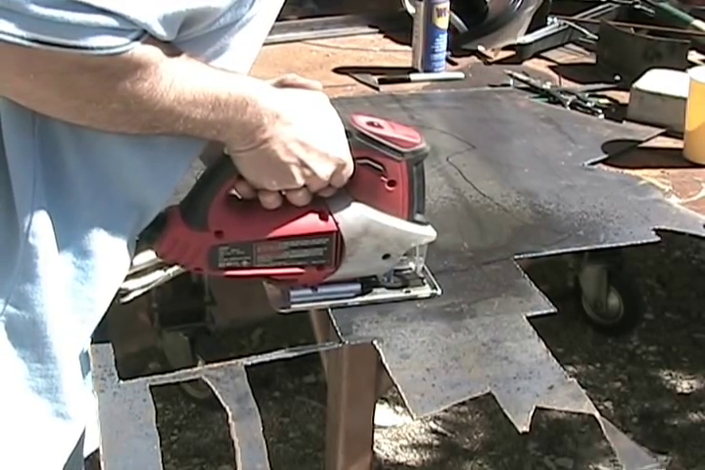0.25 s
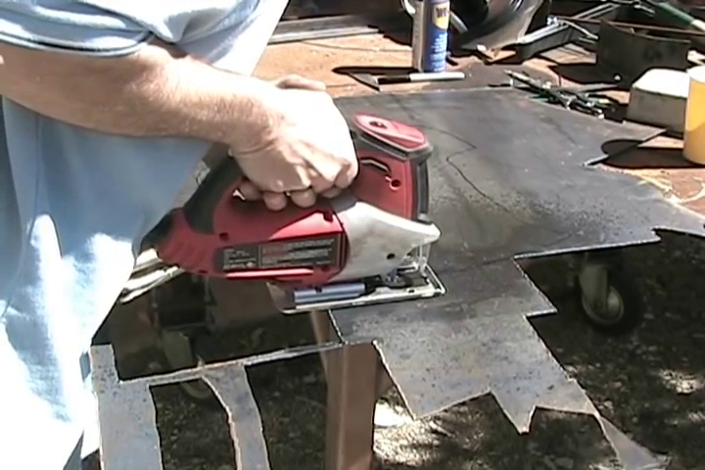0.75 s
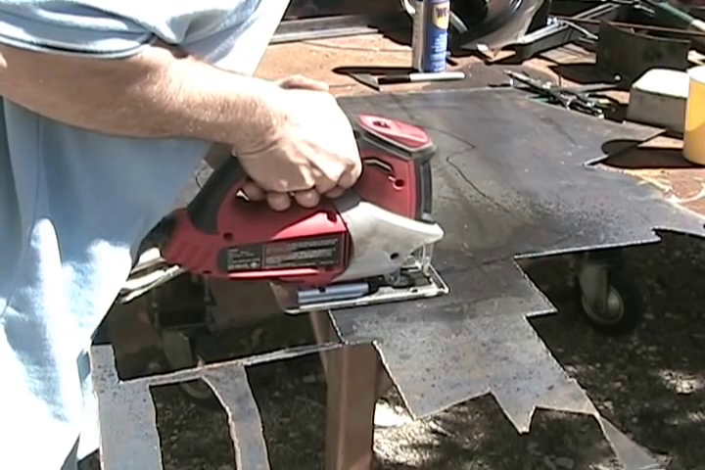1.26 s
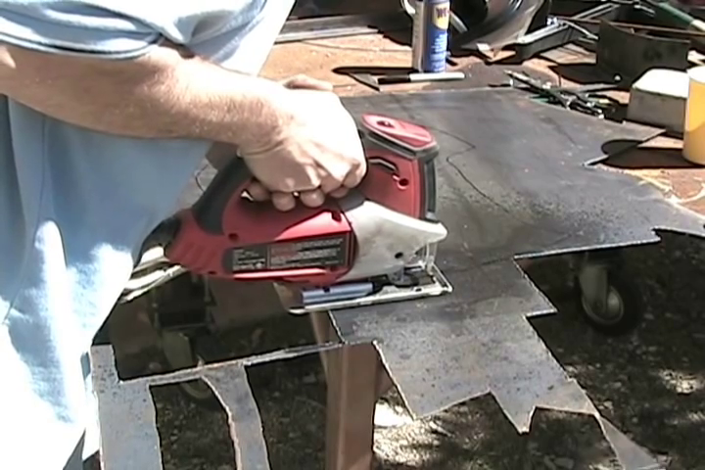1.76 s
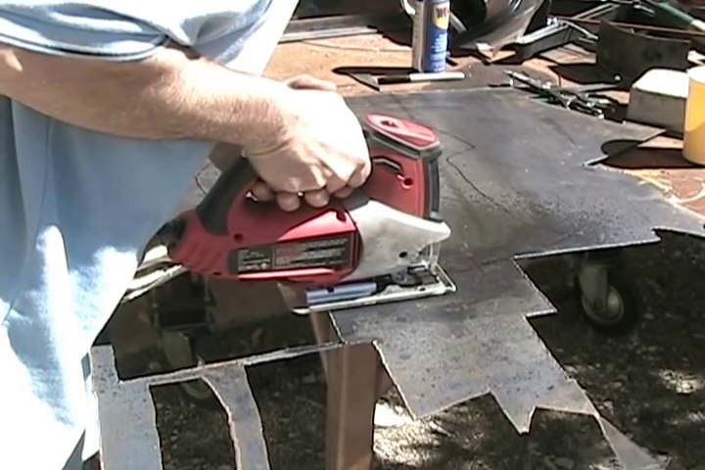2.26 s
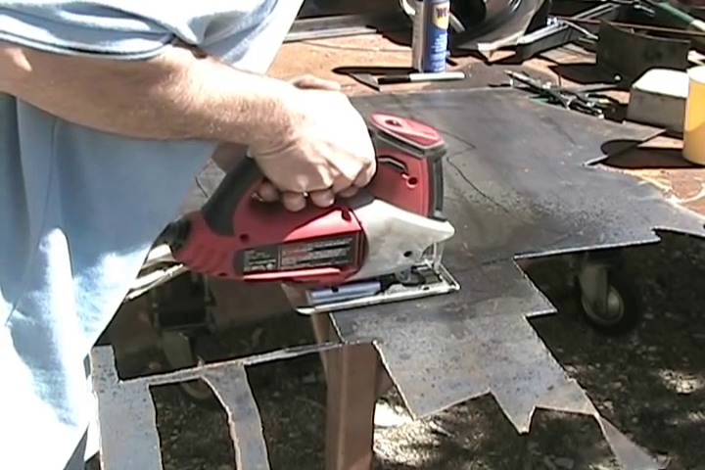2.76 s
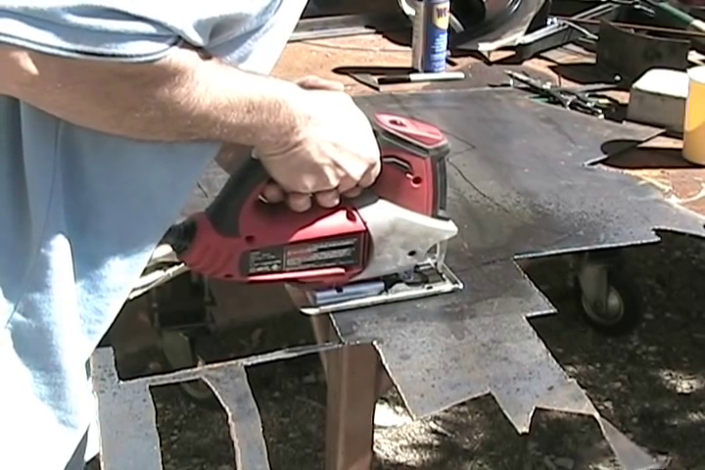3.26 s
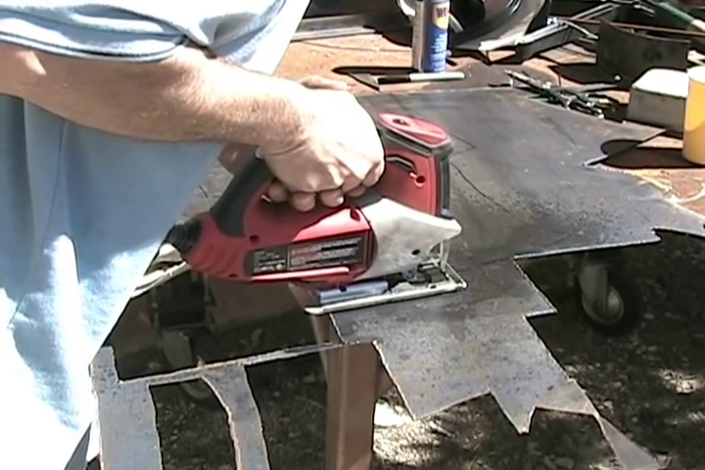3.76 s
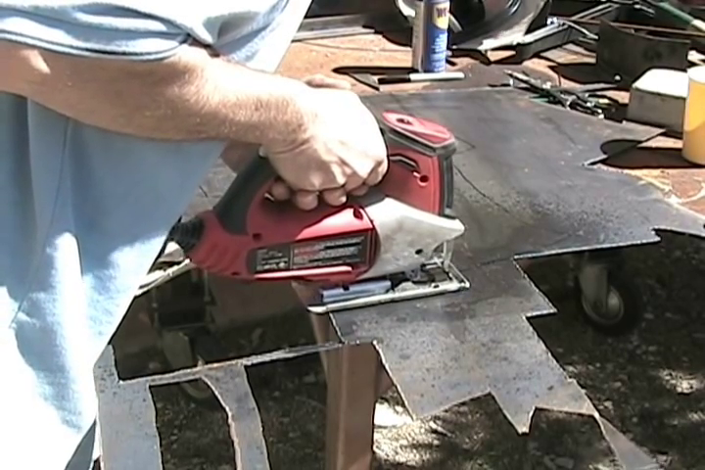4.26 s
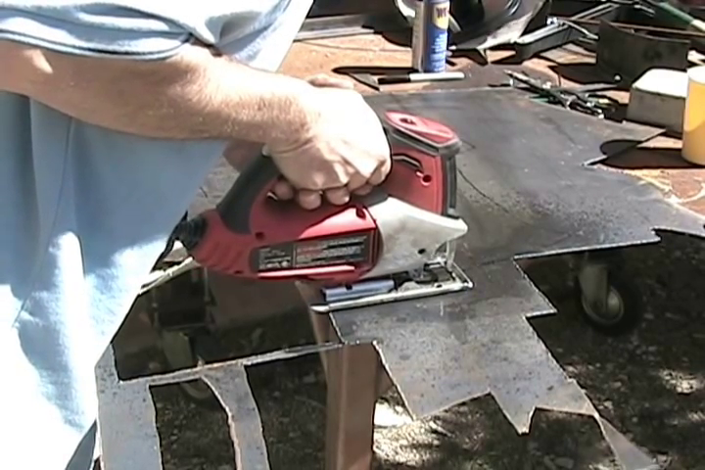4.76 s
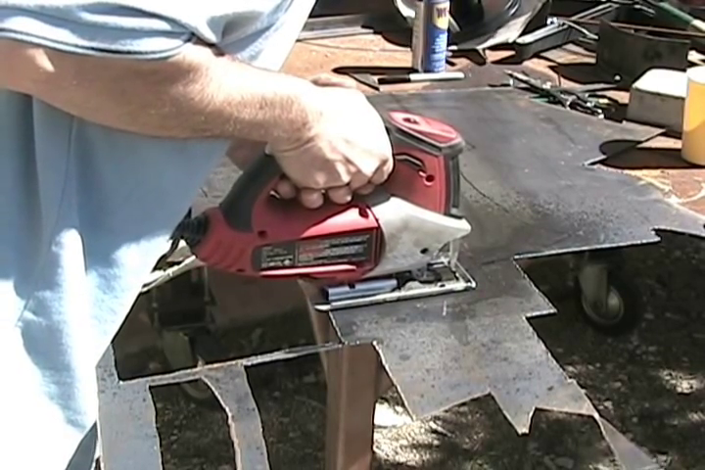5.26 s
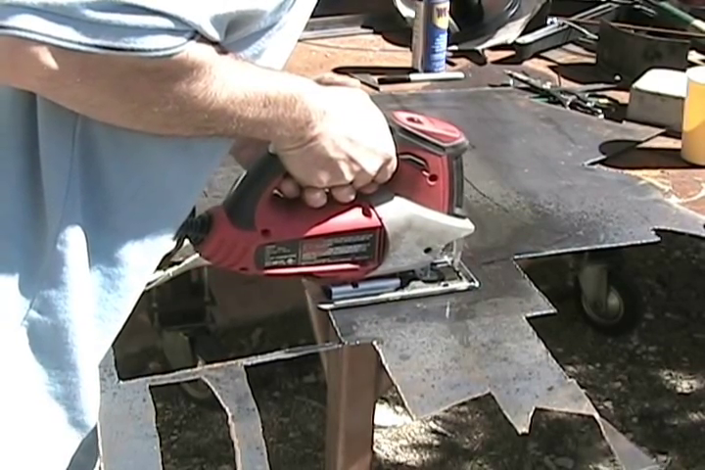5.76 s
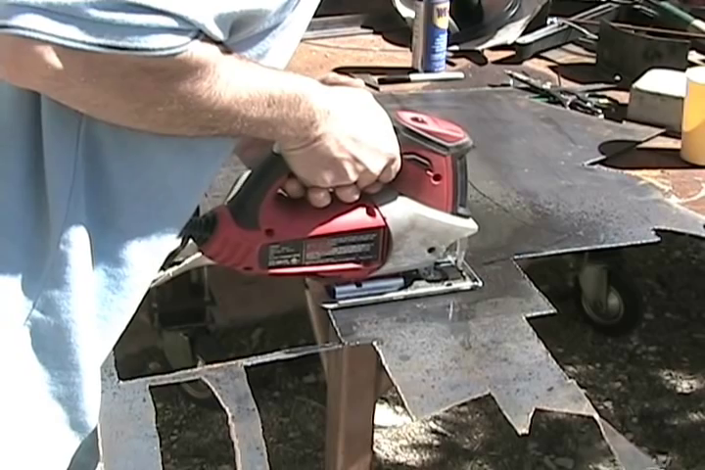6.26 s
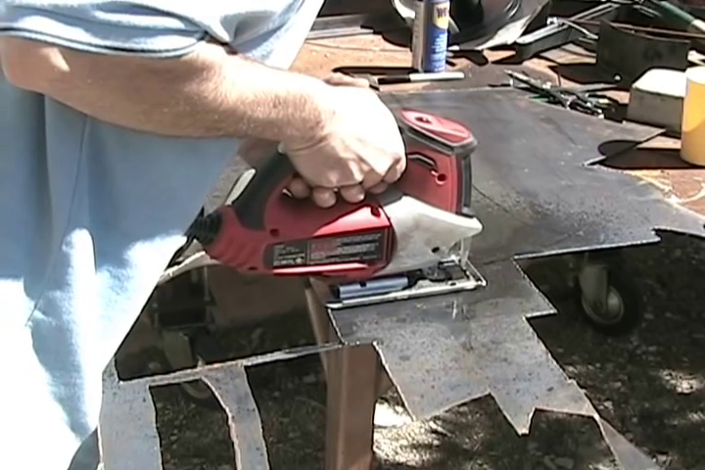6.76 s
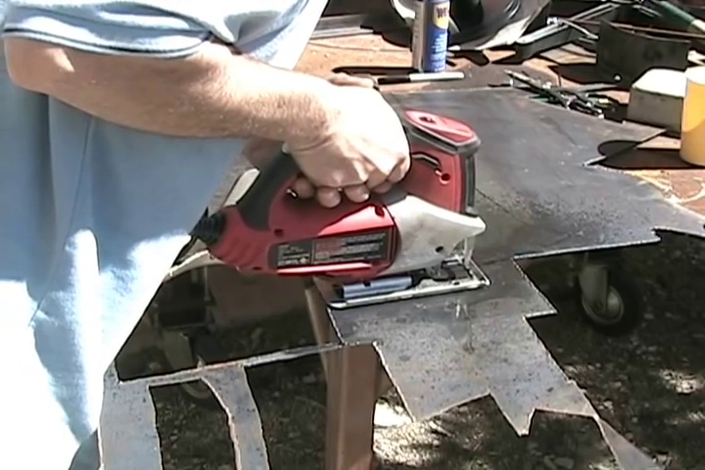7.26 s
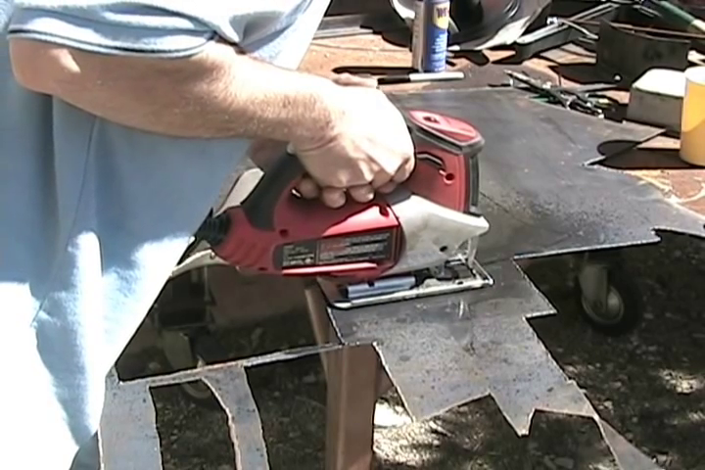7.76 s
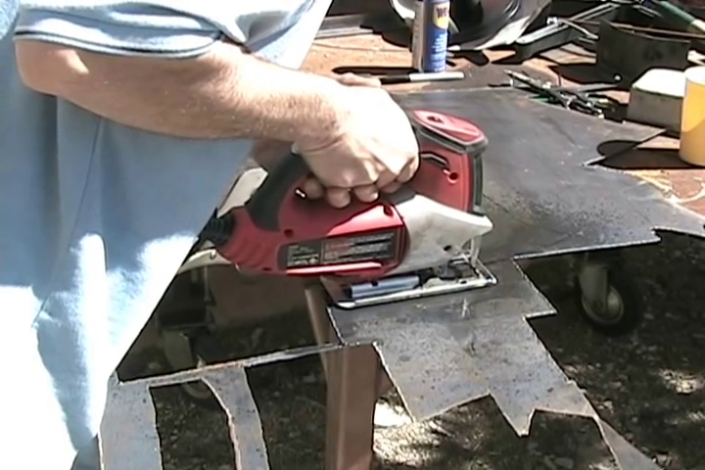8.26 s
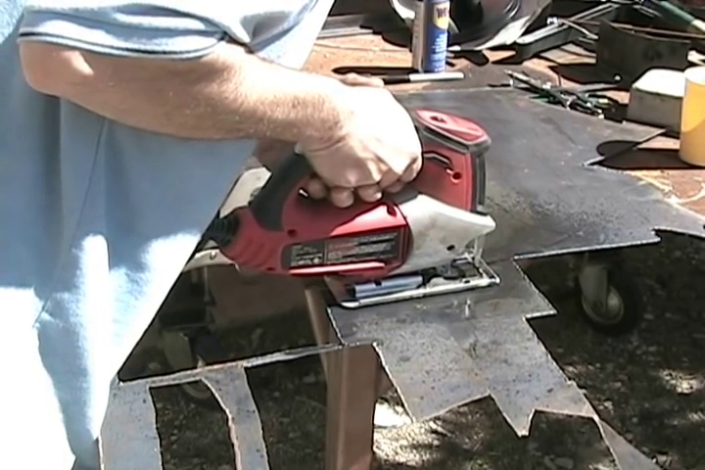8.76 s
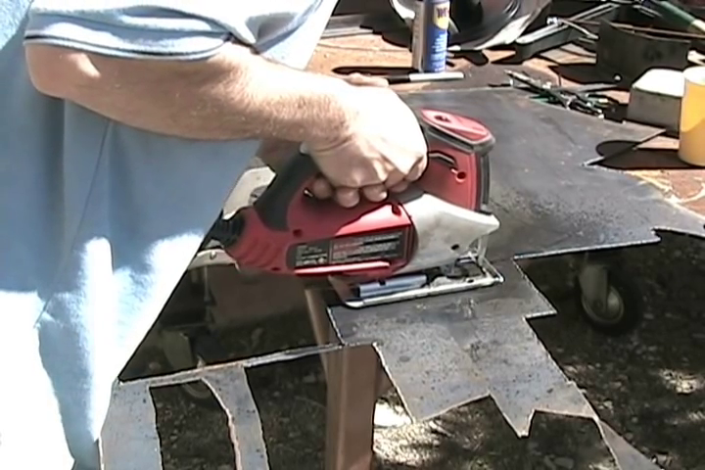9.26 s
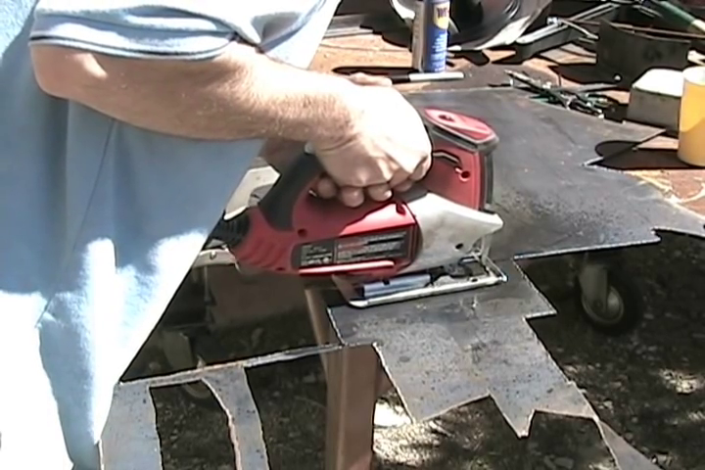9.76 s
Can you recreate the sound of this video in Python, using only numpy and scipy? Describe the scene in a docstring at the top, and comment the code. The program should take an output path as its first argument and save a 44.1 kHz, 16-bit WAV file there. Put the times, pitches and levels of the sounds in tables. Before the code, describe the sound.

An unbroken harsh buzz of an electric saw in sheet metal, heard close and dry in the open air. Rapid tooth clicks fuse into a rough mid-range roar with nasal metallic resonances and faint passing squeals. The rattle becomes looser and more irregular midway, with sharp bites and short clangs, then evens out somewhat, still cutting at the end. The stereo microphone crackles with little pops and has a dulled extreme treble.

```python
"""Jigsaw in thin sheet steel

Place: a bench outdoors, a corded jigsaw a metre or two from the two capsules of a camcorder microphone.
The blade strokes about 35 times a second: tooth clicks rasp the steel, bite hardest once a stroke, and a
rattle rings the sheet's resonances. Crank and gear hum on multiples of the stroke rate; the sheet clangs and
squeals. The camcorder overloads with a pop on each grip, notches multiples of its drum rate and cuts the
top treble; faint uneven swells of low noise lie beneath."""
import sys
import numpy as np
from scipy import signal
from scipy.fft import rfft, irfft
from scipy.io import wavfile
from scipy.ndimage import uniform_filter1d

SR = 44100
rng = np.random.default_rng(int(sys.argv[2]) if len(sys.argv) > 2 else 0)


def transcribe(u):
    """Save the signal u as a 16-bit wav file named by the first command-line argument.

    u: samples, shape (n,) or (channels, n), limited to [-1, 1]; the rate is SR.
    q: integer samples, one column per channel.
    """
    v = np.clip(np.atleast_2d(u).T, -1, 1)
    q = np.round(v * 32767).astype(np.int16)
    wavfile.write(sys.argv[1], SR, q)


N = 441000
T = np.arange(N) / SR
HZ = np.arange(N // 2 + 1) * SR / N + 1e-3  # kept off zero for the divisions
FREED_S = 2.4, 3  # the strip comes loose between these times and shakes more from then on
# points of the stroke (0-1) where the shoe (low tones) and the sheet (high tones) are struck
SHOE_KNOCK_AT, SHEET_KNOCK_AT = 0.1207, 0.38


# blade speed: (time [s], rate [strokes per second])
STROKE_RATE = [(0, 33.244), (1.5, 34.286), (1.75, 33.951), (2.75, 34.612), (3.0, 34.27), (3.5, 34.599),
               (3.75, 33.922), (4.25, 34.883), (6.25, 34.971), (6.75, 34.886), (8.5, 35.425),
               (10.0, 34.905)]


def stroke_count():
    """Strokes made so far: the running sum of the blade speed, its fraction the point of the stroke."""
    return np.cumsum(np.interp(T, *np.transpose(STROKE_RATE))) / SR


# course of the cut: (time [s], rasp level [dB], treble above 3.5 kHz [dB], usual pop of a stroke [dB])
CUT_COURSE = [(0, -28.5, -0.5, -51), (.7, -28, -1.5, -48.5), (2, -28, -2, -48), (3.3, -28, -1.5, -47),
              (4.6, -27.5, -3.5, -42), (5.2, -28, -3, -41.5), (6.5, -28, -2.5, -35), (7, -28, -3, -46.5),
              (8.5, -27, -3.5, -47.5), (10, -27.5, -3, -47)]
FLUTTER_DB, FLUTTER_PER_S = 0.86, 10.0
TREBLE_HOLD = 0.81  # share of the flutter that spares the treble


def cut_course():
    """The rasp's level flutters, its treble less; the usual pop follows the cut."""
    s, *columns = np.transpose(CUT_COURSE)
    rasp_db, bright_db, usual_db = (np.interp(T, s, column) for column in columns)
    flutter_db = FLUTTER_DB * walk(FLUTTER_PER_S)
    return rasp_db + flutter_db, bright_db - TREBLE_HOLD * flutter_db, usual_db


# hard bites: (time [s], pop level [dB], sign of the pop [about +1 left up, -1 right up], surge of grit [dB])
HARD_BITES = [(.178, -38, 1, 2.3), (.205, -42, -1, 2.8), (0.2355, -27, 1, 2.5), (.388, -42, 0.92, 2),
              (.435, -42, -1, 2.3), (.597, -40, 1, 2), (2.183, -43, 1, 2.5), (3.2302, -33, -1, 3),
              (3.4304, -34, 1, 2.2), (3.7229, -33, 1, 3.5), (3.871, -40, 1, 2.5), (4.1318, -28, -1, 3.9),
              (4.447, -37, 1, 2.5), (4.7644, -33, -1, 2), (4.9685, -32, 1, 3.4), (5.0481, -32, -1, 3.8),
              (5.1046, -26, -1, 4.1), (5.1346, -28, -1, 4.5), (5.2167, -31, -1, 3.7), (5.363, -33, 1, 2),
              (5.5661, -32, -1, 3.3), (5.62, -25, 1, 3.6), (5.7636, -29, 1, 2.4), (5.8228, -30, -1, 1.7),
              (5.8783, -30, 1, 3.2), (5.9374, -33, -1, 2.6), (5.966, -30, -1, 3.7), (6.1365, -30, 1, 3.5),
              (6.1648, -29, 1, 3.6), (6.2247, -30, 1, 2.9), (6.3956, -33, -1, 1.7), (6.5644, -33, 1, 2.9),
              (6.794, -29, 1, 2.5), (7.1097, -29, -1, 4.3), (7.1375, -36, 1, 3.3), (7.2556, -32, -1, 3.7),
              (7.7116, -34, 1, 3.6), (7.765, -34, -1, 1.5), (8.245, -42, 1, 2.6), (9.31, -32, 1, 2.5)]
BITE_AT = 0.914  # point of the stroke where the teeth grip
HARDEST_DB = -34  # loudest pop of an ordinary stroke
GRIT_DB, GRIT_PER_POP = 3, 0.16  # grit at that pop; dB less per dB of pop


def grips(turns, usual_db):
    """Per stroke a signed pop and a surge of grit, of chance size; hard bites replace ordinary ones."""
    count = int(turns[-1])
    size, side, late, rough = rng.standard_normal((count, 4)).T
    at = np.interp(np.arange(count) + BITE_AT + 0.016 * late, turns, T)
    s, db, sign, grit_db = np.transpose(HARD_BITES)
    free = np.abs(at[:, None] - s).min(axis=1) > 0.012  # strokes with no hard bite within 12 ms
    peak_db = np.minimum(np.interp(at, T, usual_db) + 5.4 * size, HARDEST_DB)
    surge_db = GRIT_DB + GRIT_PER_POP * (peak_db - HARDEST_DB) + 0.35 * rough
    where = (np.r_[at[free], s] * SR).astype(int)
    ordinary_pops = (undb(peak_db) * np.sign(side))[free]
    overloads, grit = np.zeros((2, N))
    overloads[where] = np.r_[ordinary_pops, undb(db) * sign]
    grit[where] = np.maximum(undb(np.r_[surge_db[free], grit_db]) - 0.9, 0)
    return overloads, grit


def burst(grit, rise_s, fall_s, lead_s):
    """Envelope that swells just before each grip's pop and dies away."""
    t = np.arange(int(0.05 * SR)) / SR
    body = (1 - np.exp(-t / rise_s)) ** 2 * np.exp(-t / fall_s)
    bursts = signal.fftconvolve(grit, body / body.max())[:N]
    return np.interp(T + lead_s, T, bursts)


# broad colour of the rasp: (frequency [Hz], relative gain [dB])
RASP_COLOUR = [(40, -49), (95, -38.5), (200, -31), (380, -20.5), (600, -18.5), (1050, -6.5), (2040, -7),
               (3500, -10), (4600, -10.5), (5050, -12.5), (5900, -11), (6400, -13), (7000, -18),
               (8000, -22), (9000, -18), (10000, -23), (11500, -31), (14200, -46)]
# gain of the bass before and after the strip comes loose: [dB]
RUMBLE_GAIN = [-3, -0.5]
RETURN_AT = 0.43  # point of the stroke where the blade turns
BLADE_HZ, BLADE_WIDTH_HZ, BLADE_DB = 5850, 500, 11  # the blade rings on each bite
BLADE_MOST = 0.6  # grit above which its ring grows no further


def teeth(turns, grit, bright_db):
    """Dense tooth clicks, treble loudest as the blade grips, through the sheet's broad colour."""
    turn = np.interp(T, FREED_S, (0.3, 0.1)) * near(turns, RETURN_AT, 4.9)
    grip = 2.34 * burst(grit, 0.0015, 0.008, 0.0039) + turn
    clicks = rng.standard_normal(N) * undb(0.88 * rng.standard_normal(N))
    # shifted copies of the clicks serve as unrelated ones
    top_clicks, blade_clicks = np.roll(clicks, N // 2), np.roll(clicks, N // 4)
    rasp = colour(RASP_COLOUR)
    high = 1 / (1 + (3550.0 / HZ) ** 4)  # share of the power in the treble
    low = shape(clicks * (1 + 0.059 * grip), rasp * np.sqrt(1 - high))
    top = shape(top_clicks * (1 + grip) * undb(bright_db + 0.5 * walk(14)), rasp * np.sqrt(high))
    bass = shape(low, 1 / (1 + (HZ / 470.0) ** 4))
    rumble = undb(np.interp(T, FREED_S, RUMBLE_GAIN) + 2.0 * walk(6))
    blade_burst = burst(np.minimum(grit, BLADE_MOST), 0.0012, 0.0034, 0.003)
    blade = shape(blade_clicks * blade_burst, rasp * ring(BLADE_HZ, BLADE_WIDTH_HZ))
    return low + (rumble - 1) * bass + undb(2.0) * top + undb(BLADE_DB) * blade


MEMORY = 0.85  # how much a stroke keeps of the last


def recurring(turns):
    """The same teeth meet the same edge: a rattle that nearly repeats every stroke, bunched at the knock."""
    steps = 512  # random values per stroke
    fresh = rng.standard_normal((int(turns[-1]) + 1, steps))
    pattern = signal.lfilter([1], [1, -MEMORY], fresh, axis=0).ravel()
    bunched = np.exp(1.3 * np.cos(2 * np.pi * (turns - SHEET_KNOCK_AT)))
    return level(np.interp(turns * steps, np.arange(len(pattern)), pattern) * bunched, 0)


# sheet resonances: (frequency [Hz], width [Hz], relative drive [dB],
# point of the stroke [0-1], swing [dB; + loudest at that point, - softest there])
SHEET_MODES = [(450, 105, -21.5, 0.05, 2), (746, 16, -11, 0.57, 2), (797, 25, -11, 0.56, 5.5),
               (829, 38, -6, 0.4, -8), (1006.5, 27, -3.5, 0.2, -1.5), (1035, 34, 2, 0.78, 3.5),
               (1085, 44, 1, 0, 4.5), (1165, 26, -6, 0.6, 8), (1254, 34, -.5, 0.4, 0.5),
               (1308, 32, -1.5, 0.76, 4), (1370, 50, -5, 0.78, 12), (1430, 60, -6, 0.44, -11),
               (1538, 64, -1, 0.4, -2.5), (1592, 44, -5.5, 0.53, -2), (1712, 30, -11, 0, -3),
               (1822, 44, -4, 0.8, 1), (1968, 65, -9, .9, 1.5), (2180, 110, -7.5, 1, 5.5),
               (2217, 24, -7.5, 1, 0), (2312, 67, -6, 0.86, 5), (2490, 50, -7, 1, 3),
               (2536, 147, -7, 0.76, 5), (2840, 90, -20, 0.9, -4), (3115, 80, -4.5, 0.9, 0),
               (3964, 70, -8.5, 0.65, 4), (4380, 50, -10, .9, 1), (5320, 50, -8, 1, 0),
               (5570, 50, -8, 1, -2), (5895, 65, -9, .9, 4), (6080, 130, -13, 1, -4)]
# the lengthening cut shifts the ringing: (frequency [Hz], gain from start to end [dB])
CUT_SHIFT = [(400, 6), (800, -4), (1050, 0.5), (1260, -1), (1400, 5.5), (1600, 4.5), (1850, -17),
             (2300, -9), (2600, 2), (3100, -2)]
REPEAT, REPEAT_HZ = 0.5, 1900  # power share of the rattle that recurs each stroke; halved at this frequency


def sheet(turns):
    """A rattle drives all the resonances, each swinging with the stroke; their sum is held even."""
    fresh, again, spectrum = rng.standard_normal(N), recurring(turns), 0
    step = 21  # samples per control value
    for hz, width, db, at, swing_db in SHEET_MODES:
        gained_db = np.interp(hz, *np.transpose(CUT_SHIFT)) * (T[::step] / T[-1] - 0.5)
        stroke_db = swing_db * np.cos(2 * np.pi * (turns[::step] - at))
        shake = undb(db + gained_db + stroke_db + 1.0 * walk(5)[::step])
        share = REPEAT / (1 + (hz / REPEAT_HZ) ** 4)
        rattle = np.sqrt(1 - share) * fresh + np.sqrt(share) * again
        spectrum = spectrum + rfft(rattle * np.repeat(shake, step)[:N]) * ring(hz, width)
    ringing = irfft(spectrum, N)
    return ringing / np.sqrt(uniform_filter1d(ringing ** 2, size=SR // 3))


# the shoe slaps the sheet a second time in each stroke: (time [s], point of the stroke [0-1],
# lift of the low ringing [dB], change where the sheet is pressed [dB]), both lifts relative
SECOND_SLAP = [(0, 0.58, 3.5, -2), (2.6, 0.6, 4.5, -9), (2.8, .8, 4.5, -3.5), (6.3, 0.83, 4, -1.5),
               (6.7, 0.7, 3, -0.5), (10, 0.8, 1, -2.5)]
SLAP_HZ, SLAP_WIDTH_HZ, PRESSED_AT = 930, 360, 0.27
# the middle of the rasp swells on the cutting pull
PULL_HZ, PULL_WIDTH_HZ, PULL_AT, PULL_DB = 2680, 1400, 0.95, 0.4


def stroked(steel, turns):
    """Each stroke damps and slaps the low ringing, and swells the middle of the rasp."""
    s, *columns = np.transpose(SECOND_SLAP)
    at, lift_db, damp_db = (np.interp(T, s, column) for column in columns)
    slap_db = lift_db * near(turns, at, 4.6) + damp_db * near(turns, PRESSED_AT, 4.6)
    slap = level(undb(slap_db), 0)
    pull = undb(PULL_DB * np.cos(2 * np.pi * (turns - PULL_AT)))
    slapped = (slap - 1) * shape(steel, ring(SLAP_HZ, SLAP_WIDTH_HZ))
    pulled = (pull - 1) * shape(steel, ring(PULL_HZ, PULL_WIDTH_HZ))
    return steel + slapped + pulled


def tone(turns, k, db):
    """One multiple of the stroke rate; higher ones waver more, and those from 10 up keep step with a knock."""
    loose, waver = min(k / 26.0, 1), walk(5.0)
    if k > 17:
        start = SHEET_KNOCK_AT
    elif k > 9.5:
        start = SHOE_KNOCK_AT
    else:
        start = rng.random()  # the crank's own low tones keep no step with the knocks
    phase = 2 * np.pi * k * (turns - start) + (0.24 + 0.83 * loose) * waver[::-1]
    return undb(db + (0.8 + 1.6 * loose) * waver) * np.sin(phase)


# hum of crank and shoe: (multiple of the stroke rate, level before the strip comes loose [dB],
# level just after [dB], drift from then on [dB per s])
HUM_TONES = [(3, -91, -76.5, 1.17), (4, -74, -70.5, 0.2), (5, -89, -74.5, .5), (6, -69, -65, 0),
             (7, -66, -70, 0.06), (8, -64.5, -59, -0.2), (9, -76, -72.5, 1.1), (10, -68.5, -70, -1),
             (11, -63.5, -66, 1), (12, -62.5, -70, 1), (13, -76, -64, 0.5), (14, -83, -65, -1.1),
             (16, -87, -74, -1.2), (18, -69, -59.5, 1), (19, -62, -64, 0.5), (20, -63, -70, 1.5),
             (22, -73, -60, 0)]
# whine of sheet and gear: (multiple of the stroke rate, level on a resonance of the sheet [dB])
WHINE_TONES = [(30, -48), (33, -45), (36, -45.5), (37, -48.5), (39, -46.5), (41, -48.5), (50, -44),
               (54, -43.5), (68, -43)]
SETTLE_S, SETTLE_DB = (0.9, 1.3), -7  # the shoe settles on the sheet; multiples 6 to 8 are weaker before


def hum(turns):
    """Low tones change as the strip comes loose; high ones swell as the speed nears a sheet resonance."""
    since = np.maximum(T - FREED_S[1], 0)
    unsettled_db = np.interp(T, SETTLE_S, (SETTLE_DB, 0))
    out = np.zeros(N)
    for k, before_db, after_db, drift in HUM_TONES:
        db = np.interp(T, FREED_S, (before_db, after_db)) + drift * since
        if 5.5 < k < 8.5:
            db = db + unsettled_db
        out += tone(turns, k, db)
    coarse = T[::441]
    rate = np.interp(coarse, *np.transpose(STROKE_RATE))[:, None]
    hz, width = np.transpose(SHEET_MODES)[:2]
    for k, db in WHINE_TONES:
        met = (1 / (1 + (1.44 * (k * rate - hz) / width) ** 2)).max(axis=1)
        out += tone(turns, k, db) * np.interp(T, coarse, met)
    return out * np.sqrt(2)  # sine levels are rms


# the sheet flares up: (start time [s], relative strength [dB])
SHEET_CLANGS = [(0.9647, -25), (3.0091, -37), (3.2106, -17), (4.5166, -20), (4.7187, -25), (5.0035, -26),
                (5.5757, -26), (5.7478, -32), (5.9479, -26), (6.1759, -15), (6.6049, -15), (6.8932, -41),
                (7.108, -11), (7.256, -18), (7.659, -21), (8.2277, -20), (9.3137, -20), (9.8166, -27)]


def flares():
    """Envelope of the clangs: a quick rise, then the sheet settles."""
    t = np.arange(SR // 4) / SR
    crest = 4  # peaks of the ringing over its rms
    swell = (1 - np.exp(-t / 0.01)) * np.exp(-t / 0.02)
    return signal.fftconvolve(impulses(SHEET_CLANGS), swell)[:N] / crest


# tones that ring out of the sheet for a while, some held for seconds: (start time [s], length [s], frequency
# [Hz], rms level at the crest [dB])
SHEET_SQUEALS = [(0, 1.7, 802, -49), (0.098, 0.29, 1034, -38), (.2, 2.8, 1837, -50),
                 (0.501, 3.9, 2318, -49), (0.422, 0.36, 1036, -39), (.95, 0.21, 1254, -42),
                 (1.7, 0.35, 1836, -36.5), (2.107, .065, 3110, -37), (2.9, 1.1, 380, -62),
                 (3.5, .7, 752, -50), (2.6, .9, 1260, -45), (4.95, .28, 1260, -39), (6.1, .62, 1260, -40),
                 (5.32, .17, 1315, -38), (5.3, .17, 1092, -39), (2.4, .9, 1092, -45),
                 (4.19, 0.055, 3170, -42), (7.245, .035, 5900, -38)]


def squeals():
    """Slightly wavering tones that swell and fade."""
    out, waver = np.zeros(N), walk(25.1)
    for s, length, hz, db in SHEET_SQUEALS:
        a, t = int(s * SR), np.arange(int(length * SR)) / SR
        swell = np.sqrt(np.abs(np.sin(np.pi * t / length)))
        phase = 2 * np.pi * hz * t + 0.51 * waver[a:a + len(t)]
        out[a:a + len(t)] += undb(db) * swell * np.sin(phase)
    return out * np.sqrt(2)


def overload_pops(overloads):
    """The recorder overloads on each grip: a short pop, opposite in left and right, with a slow rebound."""
    t = np.arange(-66, 67) / SR
    pops = signal.fftconvolve(overloads, np.exp(-0.5 * (t / 0.00048) ** 2), mode="same")
    return shape(pops, 1 / (1 - 1j * 40.0 / HZ) ** 2)


# faint uneven swells of low noise: (start time [s], relative strength [dB])
LOW_SWELLS = [(0.211, -66), (1.004, -70), (2.093, -71), (2.296, -74), (3.685, -74), (3.959, -75),
              (4.109, -66), (5.394, -66), (6.143, -72), (6.658, -68), (7.592, -71), (7.892, -68),
              (9.307, -65), (9.644, -76)]


def low_noise():
    """Faint uneven swells of low noise round 55 Hz."""
    t = np.arange(SR // 4) / SR
    swell = signal.fftconvolve(impulses(LOW_SWELLS), t / 0.028 * np.exp(1 - t / 0.027))[:N]
    return swell * level(shape(rng.standard_normal(N), ring(55.0, 70.0)), -5.0)


def undb(db):
    """dB to gain."""
    return np.exp(np.asarray(db) * (np.log(10) / 20))


def level(x, db):
    """Scale to an rms level."""
    return x * undb(db) / np.sqrt(np.mean(x ** 2))


def shape(x, gain):
    """Filter by a gain per frequency."""
    return irfft(rfft(x) * gain, N)


def colour(table):
    """Gain per frequency from (frequency [Hz], gain [dB]) points."""
    hz, db = np.transpose(table)
    return undb(np.interp(np.log(HZ), np.log(hz), db))


def ring(hz, width):
    """One steep resonance, gain 1 at the centre."""
    return 1 / (1 + ((HZ / hz - hz / HZ) * hz / width) ** 2)


def near(turns, point, sharpness):
    """An envelope of height 1 round one point of every stroke."""
    return np.exp(sharpness * (np.cos(2 * np.pi * (turns - point)) - 1))


def impulses(table):
    """Single samples from (time [s], level [dB]) rows."""
    s, db = np.transpose(table)
    starts = np.zeros(N)
    starts[(s * SR).astype(int)] = undb(db)
    return starts


def walk(rate):
    """Random levels every 1 / rate s, rounded off, about a steady mean; spread near 1."""
    levels = np.repeat(rng.standard_normal(int(N / SR * rate) + 2), 4)
    levels = uniform_filter1d(levels, size=4) - uniform_filter1d(levels, size=20)  # no long swells
    return np.interp(T * rate * 4, np.arange(len(levels)), 1.35 * levels)


# scattered rasp, opposite in left and right: (frequency [Hz], gain [dB])
SCATTER_COLOUR = [(100, 5), (300, -7), (700, -16), (1200, -23), (2500, -20), (3400, -26), (5300, -25.5),
                  (6300, -18), (8000, -13.5), (10000, -10), (11800, -3), (12700, -12), (13200, -26)]
# treble echo off the camcorder's body: (frequency [Hz], gain [dB])
BODY_ECHO = [(5600, -39), (6800, -20), (7900, -6.5), (9000, -15), (11200, -6), (11900, -13), (12700, -34)]
# side share a quarter cycle off the middle: (frequency [Hz], gain [dB])
QUARTER_CYCLE = [(150, -18), (500, -20), (1500, -29), (2300, -22.5), (3500, -35), (5500, -38), (6500, -20),
                 (7500, -40)]


def scene():
    """Saw and sheet in the middle; echo, scattered rasp and overload pops opposite in left and right."""
    turns = stroke_count()
    rasp_db, bright_db, usual_db = cut_course()
    overloads, grit = grips(turns, usual_db)
    ringing = sheet(turns)
    rasp = level(teeth(turns, grit, bright_db), -0.21)
    steel = stroked(rasp + undb(-3.5) * ringing, turns)
    mid = undb(rasp_db) * steel + flares() * ringing + hum(turns) + squeals() + low_noise()
    # the camcorder's body throws a treble echo, 0.2 ms late, that reaches the capsules in opposite sense
    echo = -colour(BODY_ECHO) * np.exp(-2j * np.pi * (HZ - 8750) * 0.0002)
    to_side = echo - 1j * colour(QUARTER_CYCLE)
    # a shifted copy of the steel serves as an unrelated one
    scatter = shape(np.roll(steel, N // 3), colour(SCATTER_COLOUR)) * undb(rasp_db)
    side = shape(mid, to_side) + scatter + overload_pops(overloads)
    return np.array([mid + side, mid - side])


DRUM_HZ, TOP_HZ = 299.06, 14350


def record(dry):
    """The camcorder: a comb of notches on multiples of the drum rate, then a steep cut of the top."""
    turn = np.exp(-2j * np.pi * HZ / DRUM_HZ)  # delay of one drum turn
    comb = 0.88 * (1 - 0.89 * turn) / (1 - 0.52 * turn)
    top_cut = signal.ellip(12, 0.2, 70, TOP_HZ, fs=SR, output="sos")
    return signal.sosfilt(top_cut, shape(dry, comb))


dry = scene()
out = record(dry)
transcribe(out)
```